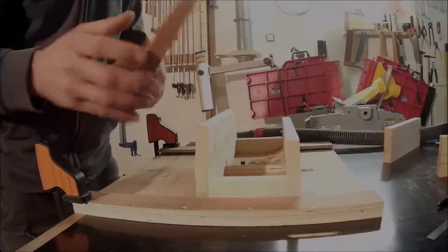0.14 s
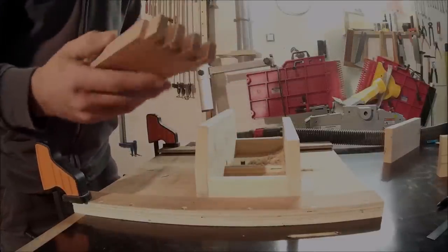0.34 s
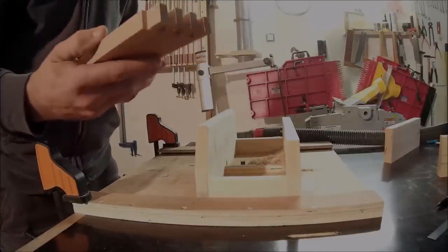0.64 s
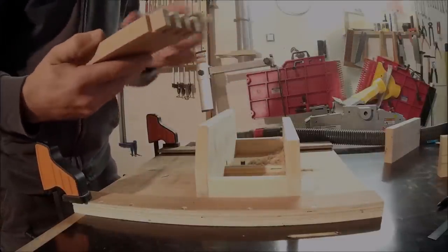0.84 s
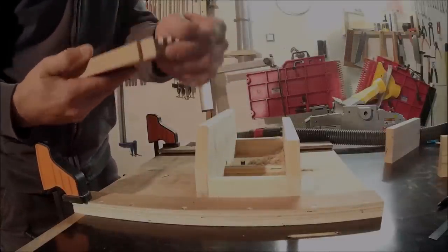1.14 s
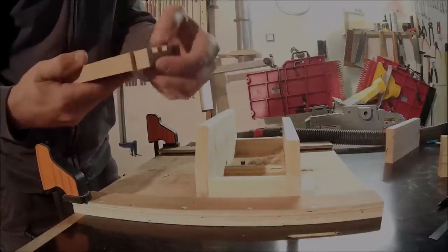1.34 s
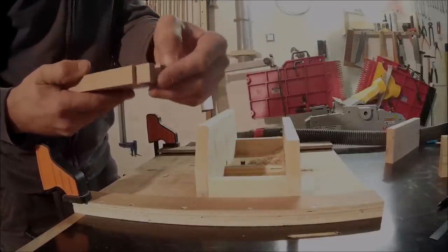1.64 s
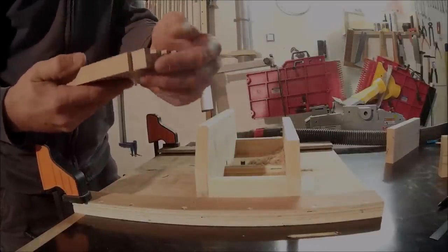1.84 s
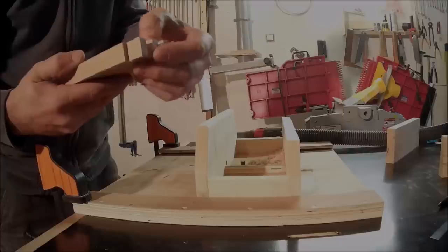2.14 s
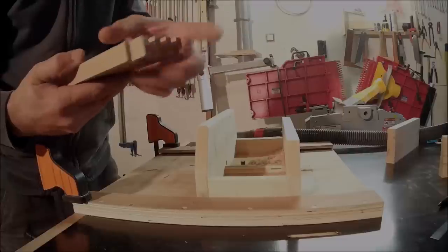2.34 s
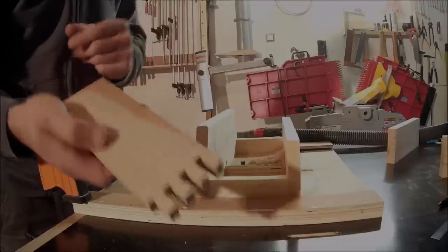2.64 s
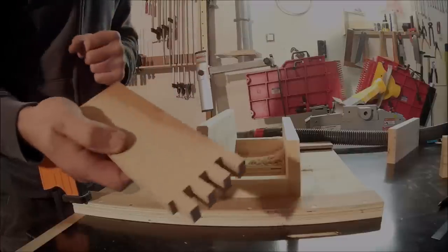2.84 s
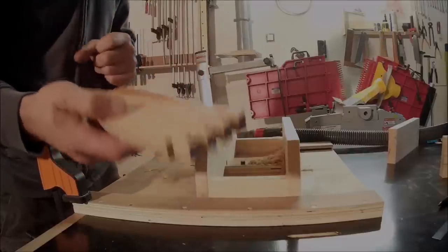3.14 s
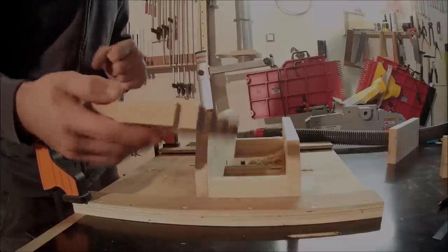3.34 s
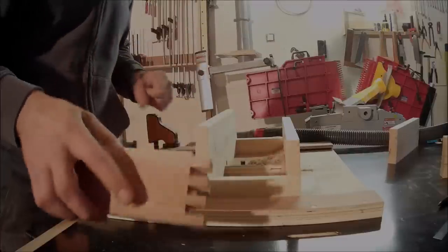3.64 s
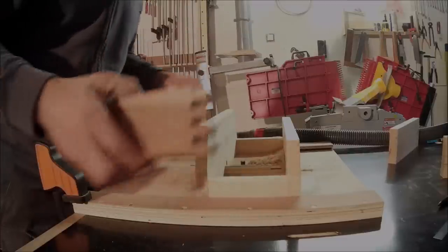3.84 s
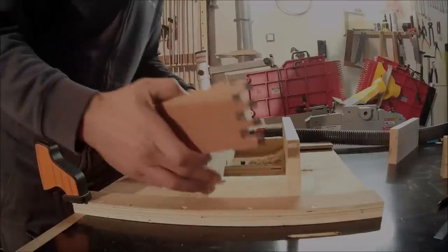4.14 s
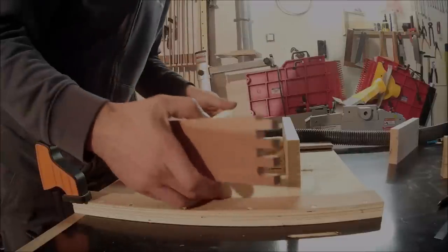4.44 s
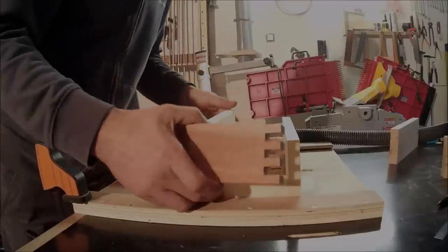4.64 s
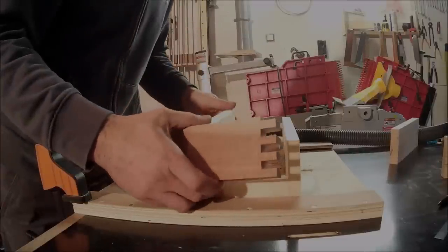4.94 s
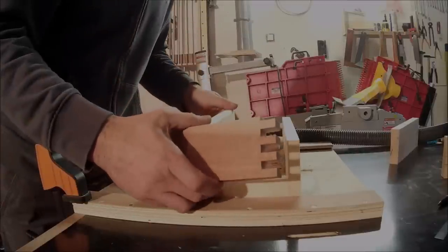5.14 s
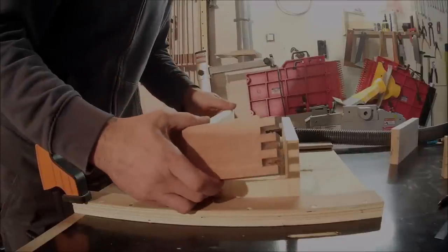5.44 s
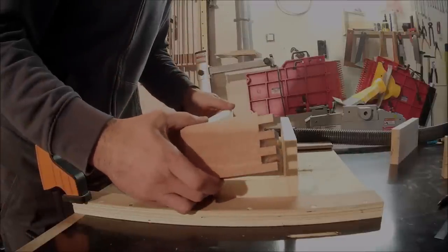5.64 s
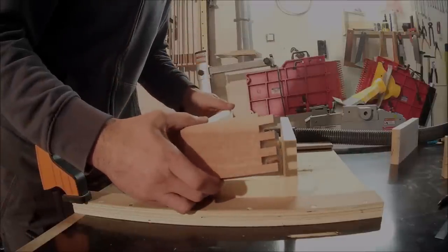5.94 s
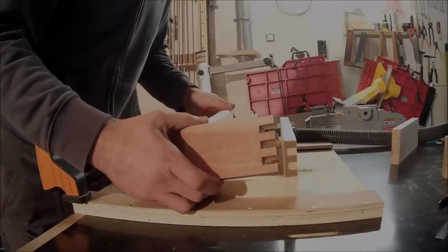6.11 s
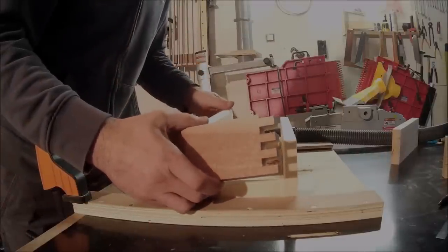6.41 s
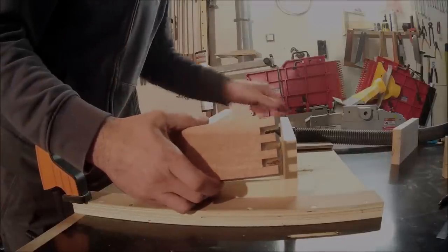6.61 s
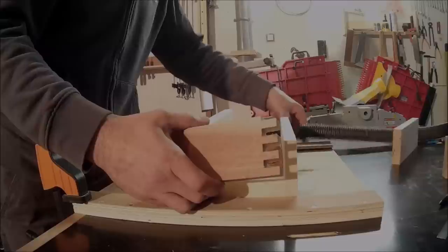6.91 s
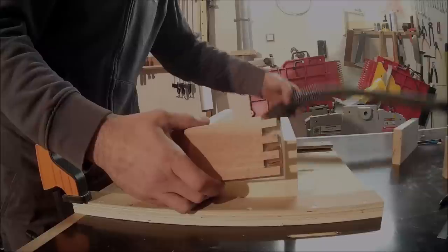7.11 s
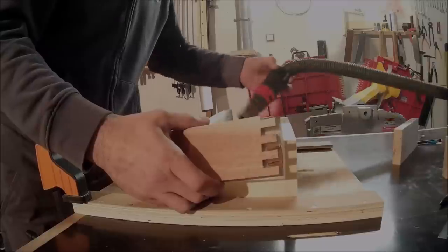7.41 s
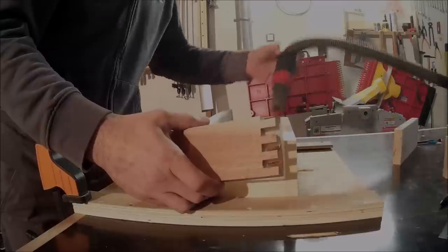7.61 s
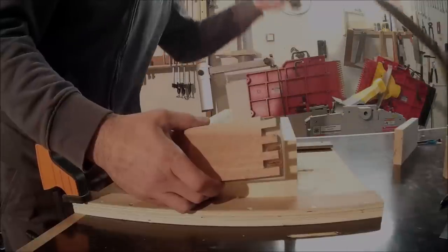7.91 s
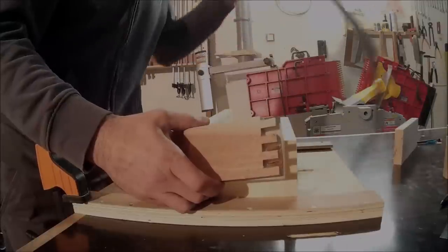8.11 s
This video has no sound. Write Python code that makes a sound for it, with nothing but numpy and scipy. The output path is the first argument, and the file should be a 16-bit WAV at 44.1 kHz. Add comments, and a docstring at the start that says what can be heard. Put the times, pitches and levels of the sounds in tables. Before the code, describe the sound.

A small fan hums steadily close by at one mid-low pitch, with a thin high whine and faint hiss, buzzing briefly past the middle.

```python
"""Steady fan hum in a quiet workshop

One steady hum, as of a small five-bladed cooling fan close by: a nearly pure blade tone with thin overtones,
a whine near 9 kHz and a faint hiss. All fan tones follow one slightly swinging speed; the air is shaped noise.
Past the middle it buzzes for about half a second, then settles to a harder whine.
Now and then the level dips briefly. A weak mains hum lies underneath."""
import sys
import numpy as np
from scipy import signal
from scipy.fft import rfft, irfft
from scipy.io import wavfile

SR = 44100
rng = np.random.default_rng(int(sys.argv[2]) if len(sys.argv) > 2 else 0)


def int16_out(signal):
    """Quantize to a 16-bit WAV file."""
    q = np.round(np.clip(np.atleast_2d(signal).T, -1, 1) * 32767)
    wavfile.write(sys.argv[1], SR, q.astype(np.int16))


N = 364707
T = np.arange(N) / SR  # time in seconds

BLADE_HZ = 427.5  # blade passes per second
HALO_AT_S = 5.96  # middle of the weak halo around the buzz


def blade_turns(hunt_hz=2.7, rises_at_s=5.55, swing_hz=0.2, jitter_hz=0.1196, jitter_rate_hz=14):
    """Counts blade passes: the speed swings slowly about its set value and trembles a little."""
    # Spells of wider swing. Each row: middle in seconds, extra swing in Hz, half width in seconds.
    hunt_spells = [(1.75, 0.2, 0.4), (5.65, 0.5, 0.36)]
    reach_hz = swing_hz + sum(extra_hz * bump(at_s, width_s) for at_s, extra_hz, width_s in hunt_spells)
    swing = reach_hz * np.sin(2 * np.pi * hunt_hz * (T - rises_at_s))
    speed_hz = BLADE_HZ + swing + jitter_hz * wander(jitter_rate_hz)
    return np.cumsum(speed_hz) / SR


def hum(turns, tone_db=-50.5, swell_db=1.4, swell_at_s=5.7, swell_width_s=1.6, flutter_db=0.19, flutter_hz=20):
    """The nearly pure blade tone, one cycle per blade pass, with one broad swell around the buzz."""
    swell = swell_db * bump(swell_at_s, swell_width_s)
    level_db = tone_db + swell + flutter_db * wander(flutter_hz)
    return gain_of(level_db) * tone(turns)


def whine(turns, flutter_db=1.4, flutter_hz=6, lift_db=0.5, octave_sag_db=9, sag_width_s=0.45):
    """Overtones flutter on their own in the uneven air flow; the buzz adds its power to each."""
    # Overtones of the blade tone, from the second multiple up, before the common lift and the flutter.
    # Each row: level running free in dB, level after the buzz in dB.
    overtones = [(-72.5, -72.5), (-71.5, -70.5), (-80, -81.5), (-87.5, -82.5), (-78.5, -76.5),
                 (-92.5, -90.5), (-89.5, -83.5), (-92.5, -84), (-87.5, -84.5), (-97, -82.5), (-90, -89),
                 (-83.5, -88.5), (-90.5, -92), (-92, -87), (-89.5, -74.5), (-91.5, -78), (-72, -76.5),
                 (-83, -75), (-69.5, -67.5), (-69.5, -64.5), (-70.5, -78.5), (-73, -68), (-75.5, -71.5),
                 (-84, -77), (-78, -85), (-80, -81.5), (-87, -96.5), (-93, -96), (-78, -81), (-88, -88.5),
                 (-88, -96), (-93, -99), (-94, -99)]
    # Colour of the buzz, before its own strength over time. Each row: frequency in Hz, overtone level in dB.
    buzz_colour = [(850, -99), (1700, -85), (2140, -75), (2560, -74), (3000, -81.5), (3420, -77.5),
                   (3850, -76.5), (4700, -81), (5900, -87.5), (7700, -72.5), (8550, -64.5), (9400, -59.5),
                   (9830, -60), (10300, -74), (11150, -64), (11550, -63.5), (13200, -72), (14500, -84)]
    hard = step(5.3, 0.6)  # passes once from the free colour to the harder one
    buzzing = buzz()
    out = np.zeros(N)
    for k, (free_db, hard_db) in enumerate(overtones, 2):
        steady = gain_of(lift_db) * ((1 - hard) * gain_of(free_db) + hard * gain_of(hard_db))
        if k == 2:  # the octave fades around the buzz
            steady = steady * gain_of(-octave_sag_db * bump(HALO_AT_S, sag_width_s))
        buzz_part = buzzing * gain_of(read(buzz_colour, k * BLADE_HZ))
        size = np.hypot(steady, buzz_part)  # powers add
        out += size * gain_of(flutter_db * wander(flutter_hz)) * tone(k * turns)
    return out


def buzz(full_s=5.48, hold_s=0.29, burst_db=0.5, rise_db_per_s=133, fall_db_per_s=55,
         halo_db=-11, halo_width_s=0.79):
    """Strength of the buzz: it swells, holds and dies away; a weak halo begins earlier and outlasts it."""
    early_s = np.maximum(full_s - T, 0)
    late_s = np.maximum(T - full_s - hold_s, 0)
    burst = gain_of(burst_db - rise_db_per_s * early_s - fall_db_per_s * late_s)
    halo = gain_of(halo_db) * bump(HALO_AT_S, halo_width_s)
    return np.hypot(burst, halo)


def thin_tones(turns, flutter_db=2.5, flutter_hz=6):
    """Weak thin tones at fixed ratios to the blade tone, each fluttering on its own."""
    # Tones between the overtones, before the flutter.
    # Each row: multiple of a fifth of the blade tone, level in dB.
    fifths_tones = [(18, -76.5), (22, -94), (23, -81), (28, -85), (33, -86), (39, -86.5)]
    # One more tone, at twelve times the blade tone, grows steadily, then drops to a trace.
    drop_at_s, drop_s = 4.16, 0.04
    growing = gain_of(-74 + 2.5 * (T - drop_at_s))  # dB, rising 2.5 dB per second
    growing_then_trace = np.hypot(growing * (1 - step(drop_at_s, drop_s)), gain_of(-84))
    lines = [(fifths / 5, gain_of(db)) for fifths, db in fifths_tones]
    lines.append((12, growing_then_trace))
    return sum(size * gain_of(flutter_db * wander(flutter_hz)) * tone(ratio * turns) for ratio, size in lines)


def strands(turns, stray_turns=0.3, stray_hz=8, flutter_db=3, flutter_hz=7):
    """Faint tones midway between the lowest overtones that stray in pitch and come and go."""
    # Each row: multiple of half the blade tone, level in dB before the flutter.
    half_orders = [(3, -82), (5, -81.5)]
    out = np.zeros(N)
    for halves, db in half_orders:
        size = gain_of(db + flutter_db * wander(flutter_hz))
        out += size * tone(halves / 2 * turns + stray_turns * wander(stray_hz))
    return out


def air(turns, dip_db, chop=0.27, chop_above_hz=1200, peak_hz=8900, peak_width_hz=1100,
        swell_db=0.36, swell_hz=8):
    """Rush and hiss of moving air, made from shaped noise; the blades chop its treble."""
    # Rush of air below the whine. Each row: frequency in Hz, level in dB per Hz.
    rush_colour = [(20, -119), (62, -114), (90, -118), (120, -113), (150, -96), (185, -99.5), (213, -92),
                   (255, -106), (285, -101), (320, -103), (430, -96.5), (540, -99.5), (640, -94.5),
                   (710, -98)]
    # Hiss above it. Each row: frequency in Hz, level in dB per Hz.
    hiss_colour = [(1050, -93.5), (1400, -100), (2200, -102), (3100, -106), (4700, -105), (5200, -101),
                   (6100, -101.5), (8400, -94), (9400, -92.5), (10300, -99), (11200, -101), (13000, -108),
                   (14700, -113), (15500, -123)]
    hz = np.fft.rfftfreq(N, 1 / SR)
    white = rfft(rng.standard_normal(N)) * np.sqrt(SR / 2)  # unit power in each Hz
    spectrum = white * gain_of(read(rush_colour + hiss_colour, hz))
    treble = spectrum * hz ** 2 / (hz ** 2 + chop_above_hz ** 2)
    peak = treble * np.exp(-((hz - peak_hz) / peak_width_hz) ** 2)
    # The bright peak holds on through the dips; the rush takes half their depth.
    hiss = irfft(peak, N) + irfft(treble - peak, N) * gain_of(-dip_db)
    rush = irfft(spectrum - treble, N) * gain_of(-dip_db / 2)
    chopped_hiss = hiss * (1 + chop * np.cos(2 * np.pi * turns))
    return (rush + chopped_hiss) * gain_of(swell_db * wander(swell_hz))


def dips(half_width_s=0.0077):
    """Depth in dB of the brief level dips over time, each a smooth bump."""
    # Each row: middle in seconds, depth in dB for the hiss outside its bright peak.
    dip_rows = [(.583, 13), (.626, 11), (1.693, 11), (1.905, 11), (2.952, 8), (3.037, 7), (3.079, 8),
                (3.677, 17), (3.978, 10), (4.04, 10), (4.124, 10), (5.361, 12)]
    return sum(depth_db * bump(at_s, half_width_s) for at_s, depth_db in dip_rows)


def mains_hum():
    """Weak steady tones at the mains frequency and its octave."""
    # Each row: frequency in Hz, level in dB.
    mains_tones = [(50, -92), (100, -103)]
    return sum(gain_of(db) * tone(hz * T) for hz, db in mains_tones)


def tone(turns):
    """A sine of unit power with a random start; turns counts its cycles."""
    return np.sqrt(2) * np.sin(2 * np.pi * (turns + rng.random()))


def wander(rate_hz):
    """Slow random drift of unit size; changes faster than the given rate are weakened."""
    hz = np.fft.rfftfreq(4096, T[-1] / 4096)
    noise = rfft(rng.standard_normal(2 * len(hz) - 2))
    slow = irfft(noise / (1 + (hz / rate_hz) ** 2))
    return np.interp(T, np.linspace(0, T[-1], len(slow)), slow / slow.std())


def bump(at_s, half_width_s):
    """A smooth rise from 0 to 1 and back."""
    return np.exp(-((T - at_s) / half_width_s) ** 2)


def step(at_s, over_s):
    """A smooth passage from 0 to 1, halfway at the given time."""
    return (1 + np.tanh((T - at_s) / over_s)) / 2


def gain_of(db):
    """Decibels to amplitude."""
    return 10 ** (np.asarray(db) / 20)


def read(points, hz):
    """Reads a level between the points of a spectrum, on a log-frequency axis."""
    f, value = np.transpose(points)
    return np.interp(np.log(hz + 1), np.log(f + 1), value)


def scene(tone_share=0.11, whine_share=0.25):
    """Fan and mains hum in the centre; the dips take much of the hiss and little of the tones."""
    turns, dip_db = blade_turns(), dips()
    blade_tone = hum(turns) * gain_of(-tone_share * dip_db)
    upper_tones = (whine(turns) + thin_tones(turns) + strands(turns)) * gain_of(-whine_share * dip_db)
    mono = blade_tone + upper_tones + air(turns, dip_db) + mains_hum()
    return np.array([mono, mono])


def record(dry, edge_hz=15650):
    """The recorder's band limit: a steep low-pass filter takes away the highest treble."""
    low_pass = signal.firwin(511, edge_hz, window=("kaiser", 9), fs=SR)
    return signal.oaconvolve(dry, low_pass[None], "same", axes=1)


dry = scene()
out = record(dry)
int16_out(out)
```